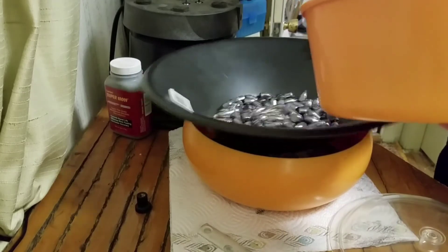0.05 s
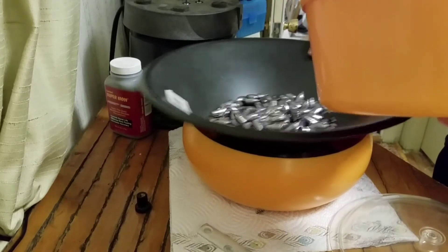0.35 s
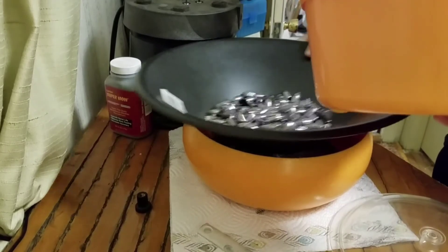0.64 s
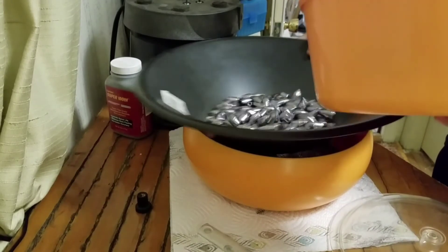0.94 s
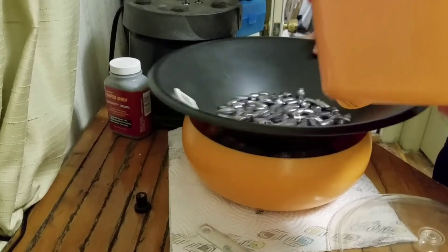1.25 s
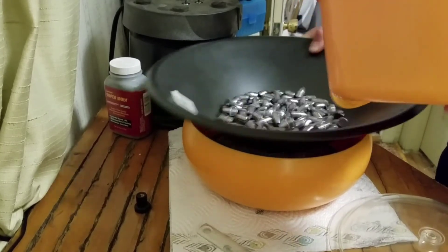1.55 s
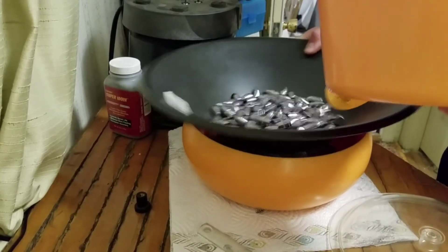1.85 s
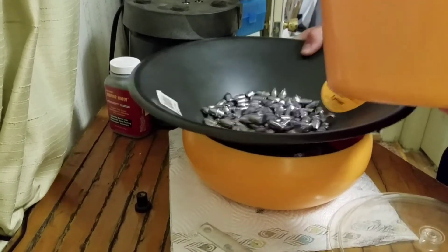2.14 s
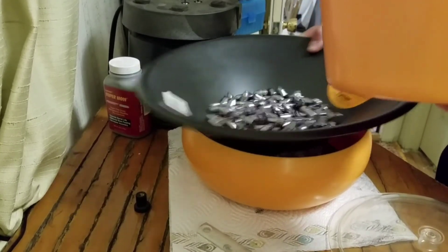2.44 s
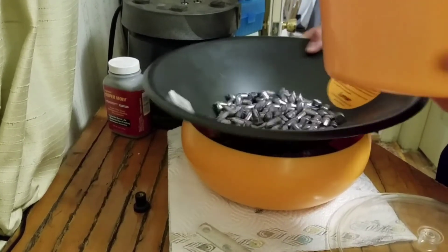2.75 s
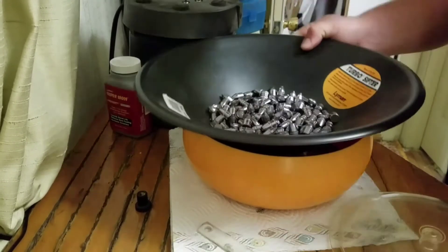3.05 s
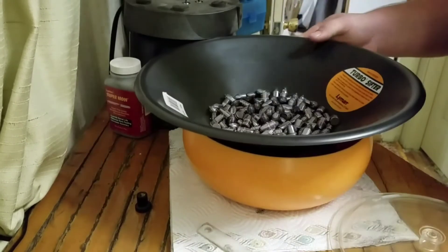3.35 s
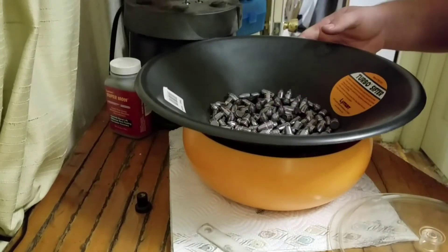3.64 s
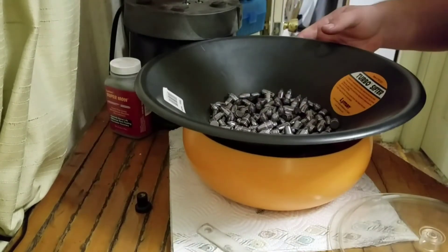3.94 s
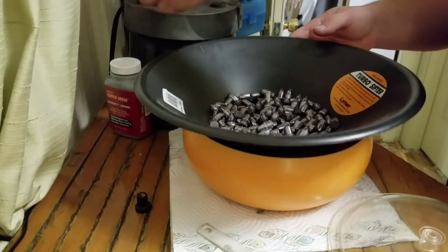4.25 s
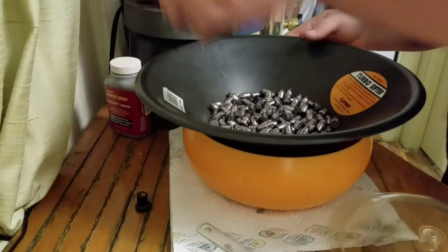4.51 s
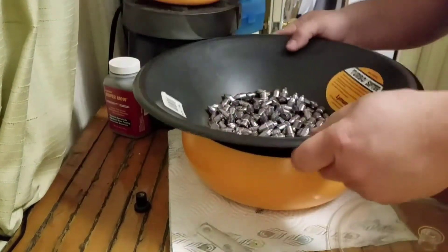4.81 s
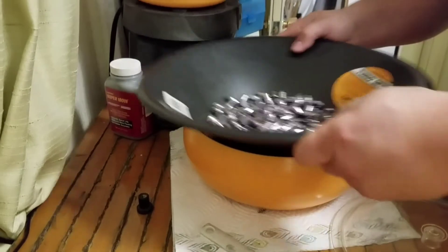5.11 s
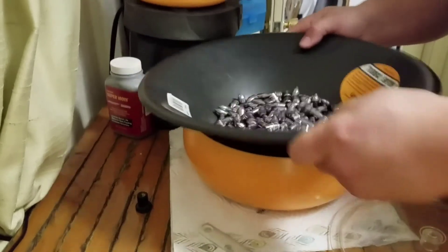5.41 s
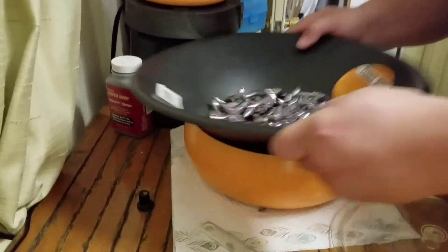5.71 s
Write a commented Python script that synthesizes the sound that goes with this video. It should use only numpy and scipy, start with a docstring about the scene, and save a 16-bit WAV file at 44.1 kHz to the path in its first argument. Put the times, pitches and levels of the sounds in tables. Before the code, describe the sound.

Lead bullets tumble and click in a plastic sifting pan, shaken quickly for about three seconds while grit hisses through its slots. The rattle stops, and hollow knocks and scrapes follow as a plastic tub is put down and dragged. The pan squeals briefly over a bowl's edge, then is swirled, grinding and chirping as the bullets slide again. Heard close up in a small room with a low hum.

```python
"""Lead bullets and polishing grit in a plastic sifting pan over a plastic bowl, in a small, humming room.
For three seconds the pan is shaken: the bullets tumble with each throw while grit hisses through the slots.
The last grit trickles out and the rim squeaks faintly under a hand. From 3.7 s hollow knocks and scrapes
follow as a tub is put down and dragged and the pan is gripped. At 4.9 s the pan is shoved, squealing, over
the bowl's edge, then swirled by hand: plastic grinds and chirps while the bullets slide and tumble again."""
import sys
import numpy as np
from scipy import signal
from scipy.fft import rfft, irfft, next_fast_len
from scipy.io import wavfile
from scipy.ndimage import map_coordinates

SR = 44100
rng = np.random.default_rng(int(sys.argv[2]) if len(sys.argv) > 2 else 0)


def transcribe(signal):
    """Save signal, clipped to [-1, 1], as a 16-bit WAV file at the path in sys.argv[1]."""
    frames = np.atleast_2d(signal).T
    limited = np.clip(frames, -1, 1)
    pcm = np.round(limited * 32767).astype(np.int16)
    wavfile.write(sys.argv[1], SR, pcm)


N = 263271
TIME = np.arange(N) / SR
RING_TIME = np.arange(round(.35 * SR)) / SR

# Tone curves, from the room up to the bullets: pitch_hz, level_db
AIR_EQ = [(25, -44), (40, -7.5), (60, 6.5), (80, -5), (120, -4), (170, -6), (250, -14.5), (500, -18),
          (1400, -24), (3000, -29), (5300, -36), (11000, -37.5), (13000, -37), (15000, -45)]
JUDDER_EQ = [(60, -35), (160, -14.5), (230, -20), (340, -3), (430, -12), (540, 3), (850, 2), (1050, 1),
             (1400, -18), (2500, -21), (6000, -71)]  # coarse slips of plastic on plastic
TUB_RASP_EQ = [(500, -33), (1300, 6.5), (1850, 10), (2300, 3), (2800, 5.5), (3400, -1.5), (4700, -5),
               (6000, -9), (9500, -10), (11000, -25), (12800, -16), (14500, -66)]
PAN_RASP_EQ = [(500, -28), (1300, 5.5), (1900, 4), (2400, 8), (2900, 3.5), (3300, -7.5), (3800, -7.5),
               (4700, -9.5), (6000, -19), (9500, -15), (11000, -33), (12800, -25), (14500, -60)]
GRIND_EQ = [(50, -15), (150, -9), (230, -10), (300, -2.5), (365, 9), (430, -9.5), (600, 0.5), (1500, -54)]
KNOCK_EQ = [(40, -58), (120, -9.5), (215, -11.5), (350, 4), (440, -4.5), (640, 2), (900, 1.5), (1150, -9.5),
            (1500, -16), (2800, -26), (4500, -41), (9000, -49), (14000, -64)]
TABLE_THUD_EQ = [(25, -45), (60, -16), (120, -6), (165, -16), (230, -8), (400, -10), (1200, -57)]
GRIT_EQ = [(500, -5.5), (2000, 9.5), (3500, -0.5), (5500, -4), (7500, -5.5), (9300, -1), (11000, -7.5),
           (13000, 1), (14500, -4.5)]
CLICK_EQ = [(300, -17.5), (1000, 6), (1800, 13), (2800, 16.5), (4600, 0.5), (6000, 1), (9000, 3.5),
            (11000, -12), (14000, -51)]  # bullet on bullet
TICK_EQ = [(500, -30), (2000, 9), (4000, 3.5), (7000, -4.5), (9300, 1), (11000, -5.5), (13000, 2),
           (14500, -2)]  # the same, sharper
CLINK_EQ = [(300, -13), (1000, 12), (1800, 9), (2800, 1.5), (4600, -2.5), (6000, -10), (9000, -14),
            (14000, -40)]  # bullet on rim
SLIDE_EQ = [(400, -27), (900, -3), (1400, 7), (2400, -27), (4000, -20), (12000, -48)]  # bullets sliding on bare plastic
LEAD_EQ = [(40, -22.5), (100, -11), (200, -11.5), (330, -2), (500, -2), (680, 0), (950, 2.5), (1300, -2.5),
           (1900, -10.5), (2800, -13.5), (3600, -25), (6000, -28), (14000, -31)]  # bullets landing on the pan

# Ringing modes of the tub, the hollow bowl, the pan's stiff rim and its floor: pitch_hz, level_db, t60_s
TUB_MODES = [(1250, -1, .16), (1780, -2, .11), (1865, -1, .11), (2030, -1, .15), (2230, -3, .14),
             (2610, 3, .12), (2715, 2, .13), (2940, -2, .12), (3290, -2, .09), (3960, -2, .08),
             (4500, 1, .09), (4620, 0, .09), (4800, -1, .1), (5020, -3, .1)]
BOWL_MODES = [(160.3, 12, 0.17), (356, 5.5, 0.36), (494.5, 0, 0.16), (550, 2, 0.15), (640, 8, 0.13),
              (700, 5, 0.13), (790, 3, 0.22), (872, -2, 0.26), (935, -3, .2), (1037, 4, 0.11),
              (1255, -3, 0.12)]
RIM_MODES = [(1852, -5, .15), (2035, 0, .15), (2236, -4, .13), (2520, -2, .1), (2585, 3, .14),
             (2705, -2, .14), (2940, -3, .15), (3490, 0, .16), (3720, 1, .1), (3850, 0, .1),
             (4540, -1, .14), (4640, -1, .1), (5110, -1, .12)]
PAN_MODES = [(159.6, -1.5, 0.33), (346.4, -13, 0.48), (474.6, 8.5, 0.1), (518.3, 1.5, 0.19),
             (597.4, 0.5, 0.34), (668.8, 9.5, 0.19), (765, 6, 0.071), (886, -4, 0.11), (941.5, 5.5, 0.16),
             (1009.6, 1.5, 0.14), (1459, 12.5, 0.04)]

# Reverb time of the room: pitch_hz, t60_s
ROOM_DECAY = [(100, 0.67), (400, 0.51), (1000, 0.27), (2800, 0.14), (7000, 0.17), (14000, 0.014)]
# Stereo width: pitch_hz, side_minus_mid_db
STEREO_WIDTH = [(60, -19), (150, -12), (300, -9.5), (650, -9), (1300, -2), (2500, -4), (4500, -0.5),
                (14000, -0.5)]
# Imbalance of the two microphones: pitch_hz, left_minus_right_db
MIC_BALANCE = [(100, 2), (380, -0.5), (900, 0.6), (2400, -1), (4400, -5), (6500, -8.5), (8300, -18.5),
               (9800, -5.5), (11300, 1), (13000, 9.5), (14500, -21)]

# Paths of the friction tones: time_s, pitch_hz, level_db
GRIP_SQUEAK = [(3.3, 2540, -70), (3.345, 2700, -62), (3.39, 2900, -68), (3.44, 3150, -77),
               (3.58, 3180, -69), (3.71, 3200, -77)]  # faint and rising, as the hand takes the rim
THIN_WHISTLE = [(3.48, 13050, -82), (3.62, 13000, -73), (3.72, 12900, -80)]  # barely there, in the pause
RIM_SQUEAL = [(4.905, 2640, -36), (4.935, 2600, -28), (4.955, 2670, -24), (4.98, 2620, -49),
              (5.03, 2584, -39), (5.11, 2600, -57)]  # sinks as the shove slows
PAN_SLIDE_TONES = [
    [(4.91, 899, -27), (4.935, 937, -30), (4.97, 894, -29.5), (5.03, 808, -31), (5.13, 741, -40)],
    [(5.86, 795, -35), (5.9, 960, -28), (5.97, 942, -33)],
]  # one path for each slide over the bowl's edge
# Short, low chirps of the swirled pan: start_s, length_s, first_hz, last_hz, level_db
SWIRL_CHIRPS = [(5.185, 0.039, 353, 400, -30), (5.215, 0.03, 266.4, 130, -29),
                (5.294, 0.038, 390, 337, -35.5), (5.385, 0.046, 470, 716, -33.5),
                (5.448, 0.032, 222.6, 415, -29), (5.53, 0.036, 392, 340, -33.5),
                (5.742, 0.028, 200.5, 426, -35.5)]

# Scrape strokes: full_force_s, rise_s, hold_s, release_s, judder_db, rasp_db
TUB_DRAGS = [(4.106, 0.017, 0.033, 0.015, -30.5, -78), (4.165, 0.035, 0.0045, .025, -37, -34.5),
             (4.212, 0.06, 0.008, 0.059, -14, -20.5), (4.226, 0.021, 0.0038, 0.011, -20.5, -55),
             (4.335, 0.035, 0.013, 0.052, -21, -39), (4.354, 0.0072, 0.016, 0.077, -40.5, -43.5)]
PAN_SHOVES = [(4.907, 0.0071, 0.05, 0.17, -19.5, -31.5), (4.932, 0.039, 0.016, 0.052, -23.5, -25.5),
              (5.02, 0.018, 0.0051, .05, -39, -48), (5.097, .008, .003, 0.014, -50, -46)]
# The swirled pan bearing on the bowl's edge: full_force_s, hold_s, level_db
PAN_GRINDS = [(4.987, 0.071, -27.5), (5.178, 0.03, -29.5), (5.31, 0.012, -30), (5.564, 0.011, -34),
              (5.77, 0.0085, -36.5)]
# Knocks on the plastic ware: start_s, level_db, hardness_db, pitch_hz
PLASTIC_KNOCKS = [(3.7265, -5, -11, 850), (3.7395, -6, -11, 660), (3.816, -22, -8, 750),
                  (3.829, -30, -2, 1000), (3.949, -28.5, 12, 950), (4.024, -35.5, 11, 950),
                  (4.098, -23, -9, 700), (4.224, -7, -15, 620), (4.345, -20, -6, 800),
                  (4.473, -21.5, 11, 1000), (4.485, -23, 2, 1000), (4.514, -24.5, 8, 950),
                  (4.588, -32, 9, 950), (4.627, -25, 8, 950), (4.666, -34, 14, 950), (4.813, -46, 5, 950),
                  (4.885, -15.5, -3, 820), (5.182, -21, 2, 380), (5.278, -23, 0, 640),
                  (5.351, -19, -6, 520), (5.457, -19, 0, 450), (5.545, -26, 0, 380)]
# The bowl bumping the table: start_s, level_db
TABLE_BUMPS = [(3.312, -42), (3.729, -20), (4.107, -26), (4.223, -40), (4.345, -21.5), (4.963, -18),
               (5.178, -23.5), (5.226, -22)]

# Bullets dropping hard on the pan: start_s, level_db, brightness_db, pitch_hz
BULLET_DROPS = [(0.152, -20.0, -2, 960), (0.285, -14.5, 4, 1360), (0.568, -14.5, 0, 970),
                (0.683, -24.0, 3, 680), (0.82, -21.0, 0, 680), (0.867, -23.0, 0, 990),
                (1.023, -23.5, 4, 1410), (1.062, -22.0, 6, 1440), (1.126, -17.5, -4, 940),
                (1.157, -19.5, -3, 660), (1.211, -19.0, 0, 730), (1.274, -17.5, 3, 940),
                (1.298, -18.5, 6, 1310), (1.35, -16.5, -3, 670), (1.443, -15.0, -3, 680),
                (1.516, -14.0, -3, 660), (1.538, -10.5, -5, 640), (1.556, -12.0, -3, 570),
                (1.596, -19.0, 5, 1500), (1.638, -19.0, 6, 1150), (1.67, -8.5, -8, 660),
                (1.764, -8.0, 0, 650), (1.797, -14.0, 0, 760), (1.832, -10.0, -7, 660),
                (1.868, -12.5, -8, 670), (1.908, -16.0, 0, 690), (2.044, -17.5, 0, 660),
                (2.129, -17.5, -2, 660), (2.15, -18.0, 5, 1460), (2.249, -14.0, -3, 670),
                (2.287, -17.0, 4, 1460), (2.316, -16.0, -4, 970), (2.403, -15.0, 4, 1530),
                (2.414, -12.0, -1, 930), (2.435, -12.0, -2, 900), (2.487, -15.5, -3, 960),
                (2.515, -13.5, -3, 660), (2.616, -17.5, 5, 1510), (2.663, -15.0, 1, 940),
                (2.749, -17.5, -3, 950), (2.765, -18.0, 5, 1210), (2.849, -12.0, -4, 930),
                (2.875, -17.0, 4, 1450), (2.993, -18.0, -3, 620), (3.069, -19.0, -2, 670),
                (5.157, -23.0, 1, 600), (5.232, -18.0, 1, 960), (5.383, -17.5, 0, 510),
                (5.594, -21.0, -2, 1000), (5.703, -23.0, 0, 980), (5.806, -17.0, -2, 470),
                (5.837, -22.0, 0, 1080), (5.941, -12.0, 2, 930)]
# Bullets clicking sharply together: start_s, level_db
BULLET_TICKS = [(0.2327, -44), (0.2498, -42), (0.284, -31.5), (.727, -45), (.747, -51), (0.9555, -49),
                (1.065, -29.5), (1.274, -29), (1.297, -30), (1.3895, -26), (1.7803, -23), (1.8302, -29),
                (1.928, -31), (2.149, -27), (2.2842, -26), (2.6728, -31.5), (2.7637, -29), (5.384, -28.5),
                (5.4397, -28.5), (5.505, -30), (5.6843, -36), (3.762, -42), (4.045, -63), (4.066, -53)]
# Light clinks of settling metal: start_s, level_db, brightness_db
RIM_CLINKS = [(3.232, -47, 0), (3.313, -55, -8), (3.861, -30.5, 3)]
# Rhythm of sifting and swirling, about eight throws a second: time_s, throws_so_far
SIFT_THROWS = [(-.07, 0), (.36, 4), (.49, 5), (.735, 7), (1.07, 10), (1.205, 11), (1.67, 15), (1.81, 16),
               (1.94, 17), (2.17, 19), (2.55, 22), (3.225, 28)]
SWIRL_THROWS = [(5.07, 0), (5.51, 4), (5.735, 6), (5.92, 7), (6.03, 8)]
# How hard the pan is shaken: time_s, effort_db
SIFT_DYNAMICS = [(0, -8), (.2, -11), (0.339, -8), (.42, -12.5), (.66, -11), (.75, -6.5), (1.14, -7.5),
                 (1.32, -2.5), (1.55, 2), (1.73, -2), (1.8, -1), (1.88, -1), (1.95, 2), (2.06, 1),
                 (2.23, -3), (2.34, -2), (2.42, 2), (2.53, 2), (2.7, 0), (2.999, -1), (3.12, -9.5),
                 (3.2, -30.5), (3.45, -56.5)]
SWIRL_DYNAMICS = [(5.06, -29.5), (5.135, -20.5), (5.16, -10), (5.3, -4.5), (5.509, -5.5), (5.589, -12.5),
                  (5.742, -6), (5.828, -11.5), (5.97, 6)]

STOP_DB_PER_S = 896  # how fast the heap comes to rest outside a bout of shaking


def amp(db):
    """Decibels to gain."""
    return 10 ** (np.asarray(db) / 20)


def unit(x):
    """Scaled to rms 1."""
    return x / np.sqrt(np.mean(x ** 2) + 1e-20)


def along(curve, hz):
    """A curve read on a log frequency axis."""
    pitches, values = np.transpose(curve)
    return np.interp(np.log(hz + 1), np.log(pitches + 1), values)


def decay(t60, t=RING_TIME):
    """A fade that loses 60 dB in t60 seconds."""
    return np.exp(-np.log(1000) * t / t60)


def wobble(rate, t=TIME):
    """Smooth random modulation, rate knots a second."""
    return map_coordinates(rng.standard_normal(4096), [t * rate], mode='wrap')


def swell(s, rise, hold, release):
    """Envelope that climbs its last 20 dB over the rise, holds from time s, and loses 20 dB per release."""
    early, late = np.maximum(s - TIME, 0), np.maximum(TIME - s - hold, 0)
    return amp(-20 * ((early / rise) ** 1.5 + late / release))


def filtered(x, response):
    """x through a frequency response."""
    n = x.shape[-1]
    size = next_fast_len(n + 8192)
    return irfft(rfft(x, size) * response(np.fft.rfftfreq(size, 1 / SR)), size)[..., :n]


def coloured(x, eq, bright_db=0, size=2048):
    """Minimum-phase EQ that keeps attacks crisp, with a treble shelf for harder contacts."""
    hz = np.fft.rfftfreq(size, 1 / SR)
    shelf = 1 - 1 / (1 + (hz / 1400) ** 4)
    cepstrum = irfft(np.log(amp(along(eq, hz) + bright_db * shelf)))
    cepstrum[1:size // 2] *= 2
    cepstrum[size // 2 + 1:] = 0
    impulse = irfft(np.exp(rfft(cepstrum)))
    return signal.fftconvolve(x, impulse[None], axes=1)[:, :x.shape[1]]


def spread(pair):
    """Mid and side become left and right: alike in the bass, wide in the treble."""
    mid, side = pair[0], coloured(pair[1:], STEREO_WIDTH)[0]
    return np.array([mid + side, mid - side])


def placed(pair, left_lag_s, left_db, diffuse_hz=3520):
    """Pans a source by level and time; the lag fades in the treble, which arrives from all sides."""
    sides = np.array([[.5], [-.5]])

    def response(hz):
        lag_s = left_lag_s / (1 + (hz / diffuse_hz) ** 2)
        return amp(left_db * sides) * np.exp(-2j * np.pi * hz * lag_s * sides)
    return filtered(spread(pair), response)


def room_tone(hum_hz=65):
    """The bed: still air and a low hum."""
    air = unit(coloured(rng.standard_normal((2, N)), AIR_EQ))
    hum = np.sin(2 * np.pi * hum_hz * TIME)
    return amp(-54) * (air + hum)


def room_tail(onset_s=.0017):
    """Diffuse reverb of the small room, each frequency dying at its own speed."""
    hz, t, noise = signal.stft(rng.standard_normal((2, len(RING_TIME))), SR, nperseg=256)
    fade = amp(-60 * t / along(ROOM_DECAY, hz)[:, None])
    tail = signal.istft(noise * fade, SR, nperseg=256)[1]
    return unit(tail[:, :len(RING_TIME)] * (1 - np.exp(-RING_TIME / onset_s)))


def contact(modes, clack_t60, ring_db, room_db, direct_db=-3, vary_db=4):
    """One strike at a random spot, in mid and side: a dead clack, the ringing modes and the room."""
    clack = unit(rng.standard_normal((2, len(RING_TIME))) * decay(clack_t60))
    clack[0, 0] += amp(direct_db) * np.sqrt(len(RING_TIME))  # the direct sound comes first
    ring = 0
    for hz, db, t60 in modes:
        strength = amp(db + vary_db * rng.standard_normal((2, 1)))
        ring += strength * decay(t60) * np.sin(2 * np.pi * (hz * RING_TIME + rng.random((2, 1))))
    return unit(clack) + amp(ring_db) * unit(ring) + amp(room_db) * room_tail()


def at_spot(sound, hz, lift_db=8, q=6.4):
    """The struck spot resonates and lifts one pitch of the hit."""
    return sound + (amp(lift_db) - 1) * signal.lfilter(*signal.iirpeak(hz, q, SR), sound)


def add_hit(track, s, db, sound):
    """Lays a hit in at time s; its peak is taken as four times the rms of its first 25 ms."""
    start = round(s * SR)
    peak = 4 * np.std(sound[0, :round(.025 * SR)])
    part = sound[:, :N - start] / peak
    track[:, start:start + part.shape[1]] += amp(db) * part


def patter(gain, rate, scatter_db):
    """Random impulses whose level follows gain; stronger motion packs them closer, up to rate a second."""
    chance = np.clip(rate / SR * np.sqrt(gain / gain.max()), 1e-4, 1)
    size = amp(scatter_db * np.clip(rng.standard_normal(N), -2, 2))
    hits = (rng.random(N) < chance) * rng.choice([-1, 1], N)
    return gain * hits * unit(size) / np.sqrt(chance)


def rattle(gain, eq, modes, rate, scatter_db, clack_t60, ring_db, room_db, spots):
    """A stream of contacts shared among several spots, each with its own timbre."""
    out = np.zeros((2, N))
    for _ in range(spots):
        spot = coloured(contact(modes, clack_t60, ring_db, room_db), eq)
        spot /= np.linalg.norm(spot, axis=1, keepdims=True)
        hits = patter(gain, rate / spots, scatter_db)
        out += signal.oaconvolve(hits[None], spot, axes=1)[:, :N]
    return out


def glide(path, width_hz):
    """Friction drives one narrow, unsteady resonance along a pitch path."""
    s, hz, db = np.transpose(path)
    near = (TIME > s[0] - .1) & (TIME < s[-1] + .1)
    t, out = TIME[near], np.zeros((2, N))
    outside_s = np.abs(t - np.clip(t, s[0], s[-1]))
    phase = 2 * np.pi * np.cumsum(np.interp(t, s, hz)) / SR
    tone = np.array([wobble(width_hz, t) * np.cos(phase) + wobble(width_hz, t) * np.sin(phase)
                     for _ in range(2)])
    out[:, near] = unit(tone) * amp(np.interp(t, s, db) - 2 * STOP_DB_PER_S * outside_s)
    return out


def friction_tones(chirp_fade_db=9):
    """The pan sings, chirps and squeals on the bowl; a faint squeak and whistle as the rim is taken."""
    sung = sum(glide(path, width_hz=100) for path in PAN_SLIDE_TONES)
    for s, length, first_hz, last_hz, db in SWIRL_CHIRPS:
        arc = [(s, first_hz, db - chirp_fade_db),
               (s + length / 2, (first_hz + last_hz) / 2, db),
               (s + length, last_hz, db - chirp_fade_db)]
        sung += glide(arc, width_hz=40)
    squeal = glide(RIM_SQUEAL, width_hz=260)
    return sung + squeal + glide(GRIP_SQUEAK, width_hz=300) + glide(THIN_WHISTLE, width_hz=60)


def scrape(strokes, rasp_eq, modes, judder_db, rasp_db, wall_db):
    """Plastic sticks and slips: coarse slips shake the bowl's walls, fine ones ring the high modes."""
    coarse, fine = sum(np.outer(amp(stroke[4:]), swell(*stroke[:4])) for stroke in strokes)
    judder = rattle(coarse, JUDDER_EQ, BOWL_MODES, rate=1300, scatter_db=1,
                    clack_t60=.081, ring_db=wall_db, room_db=-15, spots=2)
    rasp = rattle(fine, rasp_eq, modes, rate=1500, scatter_db=1.5,
                  clack_t60=.035, ring_db=-8, room_db=-7, spots=4)
    return amp(judder_db) * judder + amp(rasp_db) * rasp


def plastic_scrapes():
    """The tub is dragged into place, then the pan is shoved over the bowl's edge and grinds round on it."""
    tub = scrape(TUB_DRAGS, TUB_RASP_EQ, TUB_MODES, judder_db=-7, rasp_db=-9, wall_db=-17)
    pan = scrape(PAN_SHOVES, PAN_RASP_EQ, RIM_MODES, judder_db=-9, rasp_db=-5, wall_db=-16)
    pressure = sum(amp(db) * swell(s, rise=.016, hold=hold, release=.075) for s, hold, db in PAN_GRINDS)
    grind = rattle(pressure, GRIND_EQ, BOWL_MODES, rate=380, scatter_db=.5,
                   clack_t60=.02, ring_db=-31.5, room_db=-12, spots=2)
    return tub + pan + amp(-4.5) * grind


def plastic_knocks():
    """Hollow knocks, the heavier ones ringing the bowl more, and dull thuds of the bowl on the table."""
    out = np.zeros((2, N))
    for s, db, hard_db, hz in PLASTIC_KNOCKS:
        strike = contact(BOWL_MODES, clack_t60=.04, ring_db=-13 + .18 * db, room_db=-11,
                         direct_db=-2, vary_db=1.5)
        add_hit(out, s, db, at_spot(coloured(strike, KNOCK_EQ, hard_db), hz))
    for s, db in TABLE_BUMPS:
        bump = contact(BOWL_MODES, clack_t60=.25, ring_db=-15.5, room_db=-24)
        add_hit(out, s, db, coloured(bump, TABLE_THUD_EQ))
    return out


def loaded_pan(share):
    """The weight of the heap damps the pan: its modes ring for only a share of their time."""
    return [(hz, db, t60 * share) for hz, db, t60 in PAN_MODES]


def stray_bullets(bounce_s=.011, bounce_loss_db=6):
    """Accents: a bullet falls clear and bounces once on the pan, hits another, or clinks on the rim."""
    out = np.zeros((2, N))
    for s, db, bright_db, hz in BULLET_DROPS:
        for delay_s, loss_db in [(0, 0), (bounce_s, bounce_loss_db)]:
            strike = contact(loaded_pan(.7), clack_t60=.045, ring_db=-7.5, room_db=-11, direct_db=-6)
            add_hit(out, s + delay_s, db - loss_db, at_spot(coloured(strike, LEAD_EQ, bright_db), hz))
    for s, db in BULLET_TICKS:
        strike = contact(RIM_MODES, clack_t60=.018, ring_db=-22, room_db=-1, direct_db=-14)
        add_hit(out, s, db, coloured(strike, TICK_EQ))
    for s, db, bright_db in RIM_CLINKS:
        strike = contact(RIM_MODES, clack_t60=.014, ring_db=-1.5, room_db=-5)
        add_hit(out, s, db, coloured(strike, CLINK_EQ, bright_db))
    return out


def bullet_pings(gain, rate=70, centre_hz=2200, t60=.025, scatter_db=5.4):
    """Single bullets meet and ring briefly, each at its own pitch and place."""
    out = np.zeros((2, N + len(RING_TIME)))
    count = round(rate * N / SR)
    t = RING_TIME[:len(RING_TIME) // 4]
    starts = rng.integers(0, N, count)
    variations = np.clip(rng.standard_normal((count, 3)), -1.8, 1.8)
    for start, (detune, size, side) in zip(starts, variations):
        ring = decay(t60, t) * np.sin(2 * np.pi * centre_hz * np.exp(.3 * detune) * t)
        ping = np.outer([1, side], ring / np.linalg.norm(ring))
        out[:, start:start + len(t)] += gain[start] * amp(scatter_db * size) * ping
    return out[:, :N] * np.sqrt(SR / rate)


def shaking(throws, dynamics, tumble_surge_db=1.08, flow_surge_db=3):
    """Envelopes of tumbling bullets and flowing grit: both follow the effort and surge with each throw."""
    s, level_db = np.transpose(dynamics)
    outside_s = np.abs(TIME - np.clip(TIME, s[0], s[-1]))
    effort_db = np.interp(TIME, s, level_db) - STOP_DB_PER_S * outside_s
    throw = np.cos(2 * np.pi * np.interp(TIME, *np.transpose(throws)))
    clumps_db = .85 * wobble(rate=50)  # the bullets fall over in irregular clumps
    tumble = amp(-27.5 + .81 * effort_db + tumble_surge_db * throw + clumps_db)
    flow = amp(-39.5 + effort_db + flow_surge_db * throw + .55 * clumps_db)
    return tumble, flow


def airborne_lulls(dip_db=4.5, lull_s=.0076):
    """The tumbling ducks while the heap is in the air, just before each hard drop."""
    airborne = sum(np.exp(-((TIME - s + lull_s) / lull_s) ** 2) for s, *_ in BULLET_DROPS)
    return amp(-dip_db * airborne)


def shaken_heap():
    """Soft lead tumbles, thumps and slides on the pan and clicks together; grit runs through the slots."""
    sift_tumble, sift_flow = shaking(SIFT_THROWS, SIFT_DYNAMICS)
    swirl_tumble, swirl_flow = shaking(SWIRL_THROWS, SWIRL_DYNAMICS)
    tumble = (sift_tumble + swirl_tumble) * airborne_lulls()
    last_trickle = amp(-66.5) * swell(3.2, rise=.05, hold=0, release=.6)
    flow = sift_flow + swirl_flow + last_trickle
    lead = rattle(tumble, LEAD_EQ, loaded_pan(.73), rate=480, scatter_db=1.5,
                  clack_t60=.014, ring_db=-8.5, room_db=-5.5, spots=7)
    thumps = rattle(tumble, LEAD_EQ, loaded_pan(.71), rate=66, scatter_db=-.5,
                    clack_t60=.058, ring_db=-3.5, room_db=-18, spots=4)
    clicks = rattle(flow, CLICK_EQ, RIM_MODES, rate=120, scatter_db=.5,
                    clack_t60=.028, ring_db=-10, room_db=-2.5, spots=5)
    grit = rattle(flow, GRIT_EQ, RIM_MODES, rate=3400, scatter_db=-.5,
                  clack_t60=.00078, ring_db=-30, room_db=-6, spots=6)
    ticks = rattle(flow, TICK_EQ, RIM_MODES, rate=45, scatter_db=-2.5,
                   clack_t60=.016, ring_db=-25, room_db=-4, spots=3)
    slide = rattle(swirl_tumble, SLIDE_EQ, PAN_MODES, rate=540, scatter_db=10,
                   clack_t60=.011, ring_db=-13, room_db=-5.5, spots=3)
    body = amp(-6) * lead + amp(-12) * thumps + amp(-11) * slide
    sparkle = amp(-8) * clicks + amp(-4.5) * grit + amp(-17) * ticks + amp(-11) * bullet_pings(flow)
    return body + sparkle


def scene():
    """The close-up mix: the heap near the centre, the handling a little to one side, room tone beneath."""
    heap = placed(shaken_heap() + stray_bullets(), left_lag_s=35e-6, left_db=-.25)
    plastic = plastic_knocks() + plastic_scrapes() + friction_tones()
    handling = placed(plastic, left_lag_s=-51e-6, left_db=-1.5)
    return heap + handling + spread(room_tone())


def record(dry, top_hz=14800):
    """The two microphones colour the treble differently, and a steep low-pass closes off the top."""
    def balance(hz):
        lean_db = along(MIC_BALANCE, hz)
        power = np.cosh(np.log(amp(lean_db)))  # mean power of the two sides
        return amp(np.outer([.5, -.5], lean_db)) / np.sqrt(power)
    return filtered(filtered(dry, balance), lambda hz: 1 / np.sqrt(1 + (hz / top_hz) ** 300))


dry = scene()
out = record(dry)
transcribe(out)
```